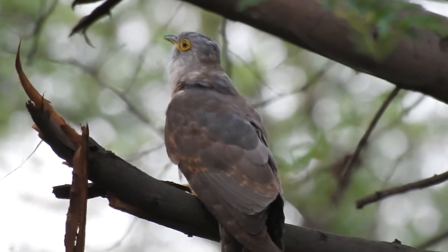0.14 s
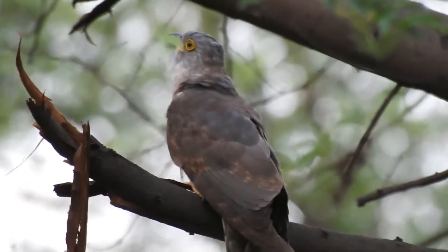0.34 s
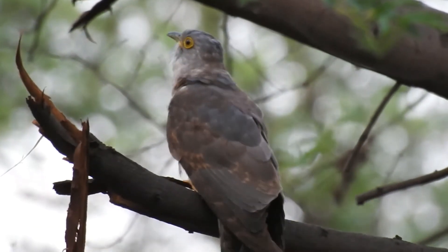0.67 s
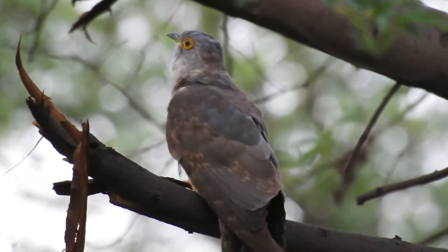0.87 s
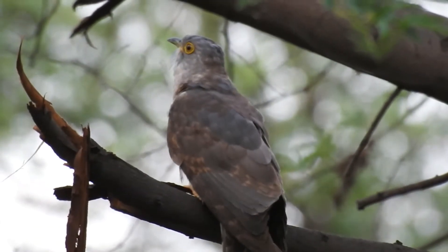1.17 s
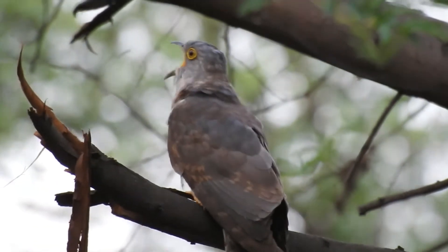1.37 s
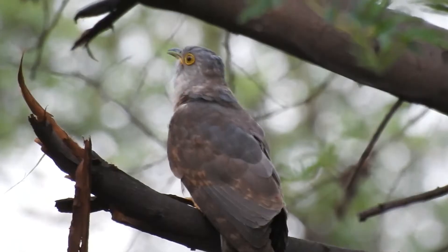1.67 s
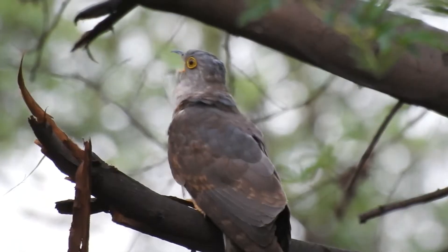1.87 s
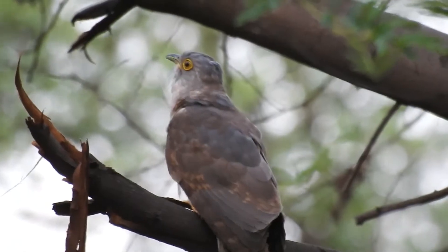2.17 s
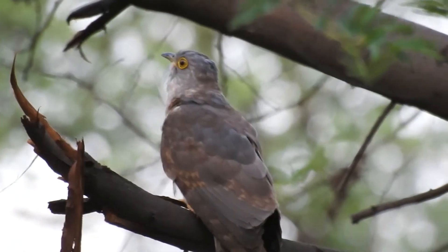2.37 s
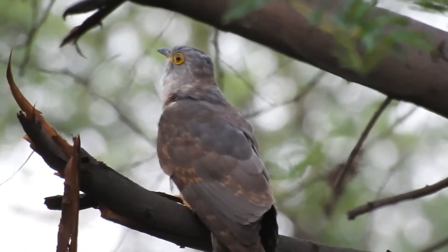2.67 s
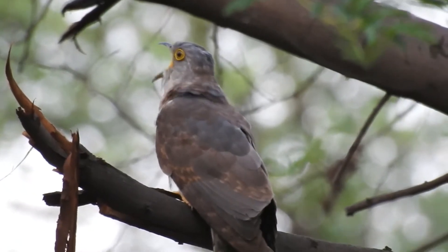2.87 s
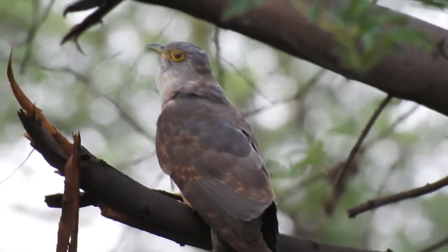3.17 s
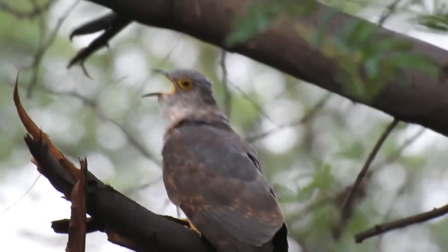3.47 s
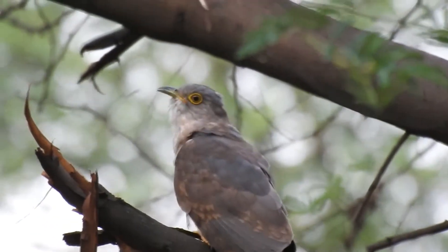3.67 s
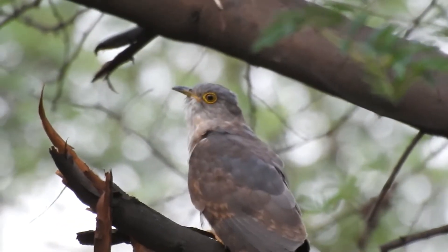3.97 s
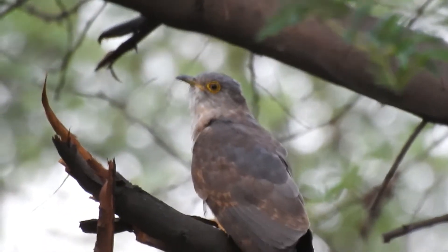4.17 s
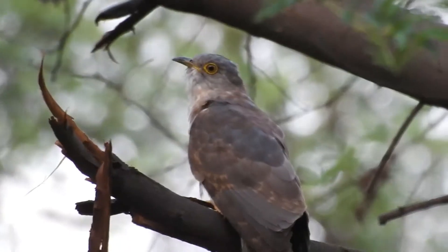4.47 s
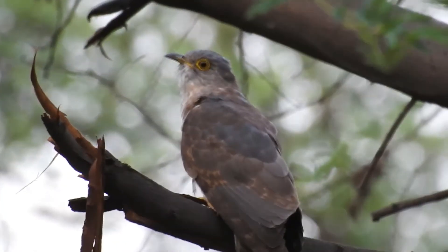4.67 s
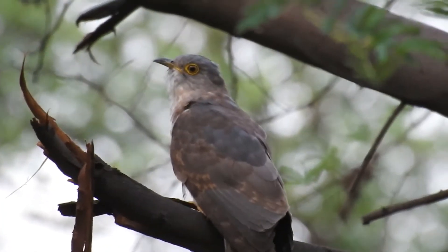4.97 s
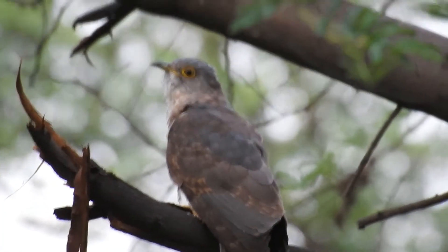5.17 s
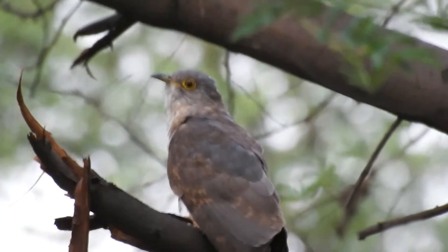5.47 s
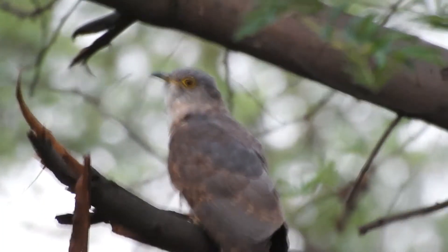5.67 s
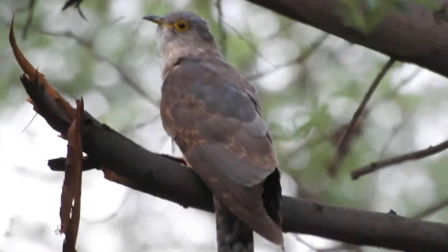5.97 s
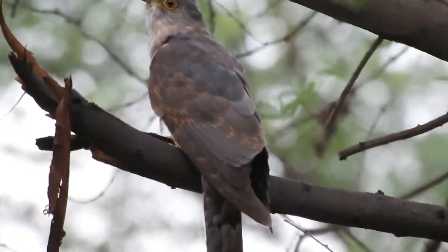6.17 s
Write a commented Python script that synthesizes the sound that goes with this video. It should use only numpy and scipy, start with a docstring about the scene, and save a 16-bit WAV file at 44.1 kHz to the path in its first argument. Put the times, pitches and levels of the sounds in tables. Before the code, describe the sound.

A cuckoo-like bird whistles three loud two-part phrases in echoing woodland while a harsher bird squawks and wind buffets the microphone.

```python
"""A cuckoo whistles three two-part phrases, echoed by trunks and a far tree line, while a harsh-voiced bird squawks.
Behind them faint whistles slide, small birds twitter far away and distant traffic hums.
Gusts buffet, crackle and snap at the two microphone ports of a hand-held device, mostly the right one.
Whistles are gliding sines, squawks are throbbing stacks of partials; wind and air are coloured noise,
echoes are scattered noise responses, and handling knocks are short damped rings."""
import sys
import numpy as np
from scipy import signal
from scipy.fft import rfft, irfft
from scipy.io import wavfile
from scipy.ndimage import uniform_filter1d

SR = 44100
rng = np.random.default_rng(int(sys.argv[2]) if len(sys.argv) > 2 else 0)


def amplitude_ratio(level_db):
    """Convert a level in decibels to the matching linear amplitude (field) ratio."""
    exponent = np.asarray(level_db, float) / 20
    return 10 ** exponent


def store_pcm(level_fs):
    """Save levels as 16-bit WAV."""
    pcm = np.round(np.clip(level_fs, -1, 1) * 32767).astype(np.int16)
    wavfile.write(sys.argv[1], SR, np.atleast_2d(pcm).T)


N = 279153
TIME = np.arange(N) / SR

# squawks of the harsh bird: (start [s], length [s], top pitch [Hz], relative level at the peak [dB],
# final drop in pitch [Hz], peak position [share of length])
SQUAWK_CALLS = [(0.595, 0.069, 1238, -42.5, 60, .4), (0.708, 0.084, 1263, -43.5, 120, 0.459),
                (0.829, .075, 1262, -43, 100, 0.595), (0.961, .115, 1261, -41.5, 100, 0.546),
                (1.133, .13, 1200, -40.5, 120, .55), (1.96, 0.097, 1185, -39.5, 29.7, .4),
                (2.075, 0.15, 1249, -33, 4.8, .43), (2.24, 0.21, 1285, -31.5, 230, .3),
                (3.189, .06, 1230, -35.5, 5.05, 0.57), (3.305, 0.18, 1296, -30.5, 12.1, .5),
                (3.491, 0.1, 1306, -31.5, 80, .3), (3.582, .155, 1233, -36.5, 200, .4),
                (3.785, 0.077, 1272, -38.5, 100, 0.563), (3.896, 0.098, 1222, -31, 5, 0.46),
                (4.018, .15, 1254, -30.5, 4, .47), (4.181, .118, 1305, -28, 5, .45),
                (4.305, .365, 1297, -29.5, 30, 0.659), (4.74, 0.13, 1230, -44.5, 90, .4),
                (5.884, 0.025, 1213, -34.5, 20, .45), (5.975, 0.14, 1272, -32.5, 5, .45),
                (6.169, 0.048, 1281, -34.5, 29, 0.37), (6.222, 0.064, 1250, -36, 110, 0.27),
                (6.299, 0.048, 1198, -34, 5, .35)]


def on_log(table, hz):
    """A (frequency [Hz], value) table read on a log-frequency axis."""
    at, value = np.transpose(table)
    return np.interp(np.log(np.maximum(hz, 1)), np.log(at), value)


def unit(x):
    """Scaled to rms 1."""
    return x / np.sqrt(np.mean(x ** 2))


def noise(colour, weight=1):
    """White noise filtered to a (frequency [Hz], level [dB]) colour."""
    spectrum = rfft(rng.standard_normal(N))
    gain = amplitude_ratio(on_log(colour, np.fft.rfftfreq(N, 1 / SR)))
    return irfft(spectrum * gain * weight, N)


def walk(rate):
    """A wandering control signal of rms 1: random levels held 1 / rate seconds and slewed twice."""
    k = int(SR / rate)
    held = np.repeat(rng.standard_normal(N // k + 1), k)
    return unit(uniform_filter1d(uniform_filter1d(held, k), k)[:N])


def notes(tables, fade_s, bend_s):
    """A gate open during notes, then pitch, level and other columns at every sample, with rounded corners."""
    s, hz, *columns = np.transpose(np.concatenate(tables))
    gate = sum((TIME >= note[0][0]) & (TIME < note[-1][0]) for note in tables)
    pitch = uniform_filter1d(np.interp(TIME, s, hz), int(bend_s * SR))
    curves = [np.minimum(gate, 1.), pitch] + [np.interp(TIME, s, c) for c in columns]
    return [uniform_filter1d(c, int(fade_s * SR)) for c in curves]


def place(x, pan_db, lag_s):
    """Stereo position: left is pan_db louder than right and hears the sound lag_s later."""
    turn = np.exp(-1j * np.pi * np.fft.rfftfreq(N, 1 / SR) * lag_s)
    return irfft(rfft(x) * np.array([turn * amplitude_ratio(pan_db / 2), amplitude_ratio(-pan_db / 2) / turn]), N)


def cuckoo_notes():
    """Each phrase as (time, pitch, level) points: a held note, then a dipping one stretched to its length."""
    # held first note of each phrase: (end [s], length [s], top pitch [Hz], level [dB])
    held_calls = [(0.181, .26, 2292, -15), (1.695, .226, 2375, -15.5), (3.183, .257, 2437, -14.5)]
    # second note, which dips and climbs back: (start [s], length [s], top pitch [Hz], level [dB])
    dip_calls = [(0.329, 0.38, 2355, -16.5), (1.847, .369, 2462, -15), (3.333, .373, 2491, -14.5)]
    # shapes, moved to the top pitch of each note
    # rise of the held note: (time after start [s], pitch [Hz], level relative to the note [dB])
    rise = [(0, 1720, -23), (.016, 2110, -12.5), (.033, 2300, -1.5), (.052, 2385, 0), (0.073, 2414, -2),
            (0.099, 2397, -0.4)]
    # fall of the held note: (time before end [s], pitch [Hz], level relative to the note [dB])
    fall = [(.075, 2385, 0.5), (.045, 2275, -1.9), (.02, 2040, -2.5), (.006, 1810, -13),
            (0.0011, 1760, -25)]
    # dipping note: (time after start [s], pitch [Hz], level relative to the note [dB])
    dip = [(0, 1640, -26.5), (.019, 2220, -6.5), (.035, 2400, -1.5), (0.052, 2490, 0.4), (.082, 2400, 0.2),
           (.136, 2195, -1.5), (.17, 1810, -2.5), (.198, 1485, -8.5), (.214, 1430, -17), (.23, 1760, -3),
           (.245, 2160, -6.4), (.276, 2085, -2.5), (.33, 1994, -4.5), (.36, 1880, -12), (.378, 1776, -25)]
    top = max(hz for _, hz, _ in rise)
    dip_top, dip_s = max(hz for _, hz, _ in dip), dip[-1][0]
    phrases = []
    for end, long, hz, db in held_calls:
        opening = [(end - long + s, f * hz / top, db + d) for s, f, d in rise]
        closing = [(end - s, f * hz / top, db + d) for s, f, d in fall]
        phrases.append(opening + closing)
    for start, long, hz, db in dip_calls:
        phrases.append([(start + s * long / dip_s, f * hz / dip_top, db + d) for s, f, d in dip])
    return sorted(phrases)


def cuckoo():
    """A nearly pure whistle with faint, fluttering partials that grow with effort."""
    # weaker partials: (multiple of the whistle [ratio], level relative to it before effort and beak [dB])
    whistle_partials = [(2, -25), (3, -16), (4, -30), (5, -26.5)]
    # beak resonance, which colours the partials, strongest near 7 kHz: (frequency [Hz], gain [dB])
    beak = [(3000, -3.5), (4800, -9.5), (5800, -4.5), (7000, -1.5), (12500, -5)]
    gate, hz, db = notes(cuckoo_notes(), fade_s=0.002, bend_s=0.005)
    phase = 2 * np.pi * np.cumsum(hz * (1 + 0.00209 * walk(90))) / SR
    # the beak closes on low notes and mutes the partials
    effort_db = 1.4 * (db + 14.0) + 11.0 * np.log2(hz / 2280.0) + 2.8 * walk(120)
    upper = sum(amplitude_ratio(d + effort_db + on_log(beak, k * hz)) * np.sin(k * phase) for k, d in whistle_partials)
    loudness = amplitude_ratio(db + 0.71 * walk(60))
    return np.sqrt(2) * gate * loudness * (np.sin(phase) + upper)


def squawk_notes():
    """Each squawk scoops up, swells, fades and drops in pitch: (time, pitch, level, gain of low partials)."""
    attack_s, scoop_hz = .018, 25.1
    onset_db, swell_db, fade_db, end_db = -9.5, -4.5, -5, -12.5
    drop_from = 0.45  # share of the time between peak and end
    # gain of the two lowest partials: at the start, when held, and added as the pitch drops
    low_start_db, low_held_db, low_db_per_hz = -4, 4, 0.0089
    squawks = []
    for s, long, hz, db, drop, peak in SQUAWK_CALLS:
        drop_share = peak + drop_from * (1 - peak)
        squawks.append([
            (s, hz - scoop_hz, db + onset_db, low_start_db),
            (s + min(attack_s, long / 4), hz - scoop_hz / 2, db + swell_db, low_start_db),
            (s + peak * long, hz, db, low_held_db),
            (s + drop_share * long, hz, db + fade_db, low_held_db),
            (s + long, hz - drop, db + end_db, low_held_db + low_db_per_hz * drop)])
    return squawks


def squawker():
    """Partials and breath coloured by the throat; each squawk starts as separate throbs, then runs clearer."""
    # resonances of the throat: (frequency [Hz], gain [dB])
    throat = [(1300, -35.5), (2600, -3.5), (3900, -12), (5200, -1.5), (6500, -1.5), (7800, -4.5),
              (9100, -22.5), (11700, -11.5), (14000, -17.5)]
    throb_hz = 83.65
    gate, hz, db, low_db = notes(squawk_notes(), fade_s=0.0024, bend_s=0.01)
    starts = np.transpose(SQUAWK_CALLS)[0]
    age = TIME - starts[np.maximum(np.searchsorted(starts, TIME) - 1, 0)]
    # soft squawks hardly throb
    effort = np.clip((db + 50.) / 14.1, .2, 1)
    rasp = np.clip(effort * (0.15 + 0.768 * np.exp(-(age / 0.1097) ** 2)), 0, 1)
    # the pitch is rougher where the voice rasps
    jitter = (0.0041 + 0.01188 * rasp) * walk(350)
    phase = 2 * np.pi * np.cumsum(hz * (1 + jitter)) / SR
    stack = [amplitude_ratio(on_log(throat, k * hz) + 3.6 * walk(200)) * np.sin(k * phase) for k in range(1, 12)]
    breath = amplitude_ratio(-5.5) * (.3 + rasp) * unit(noise(throat))
    cycle = (age * throb_hz - .35 + 0.037 * walk(30)) % 1
    # each throb opens fast and closes slowly
    pulse = (1 - np.exp(-cycle / 0.074)) * np.exp(-(cycle / 0.5) ** 2)
    throb = 1 - rasp + 2.52 * rasp * pulse
    voice = amplitude_ratio(low_db) * sum(stack[:2]) + sum(stack[2:]) + breath
    return gate * amplitude_ratio(db) * throb * voice


def port_shares(pan_db):
    """Splits a power between left and right so that the two shares sum to 1."""
    ratio = amplitude_ratio(2 * pan_db)
    return np.array([ratio / (1 + ratio), 1 / (1 + ratio)])


def gusts():
    """Strength of the wind at each port: the steady part wavers, buffets add to it in power."""
    # steady part: (time [s], relative level [dB], left minus right [dB])
    steady_wind = [(0, -35.5, -8), (1.09, -40, -1), (1.138, -19, -7), (1.45, -16.5, -14.5), (1.75, -16, -2),
                   (2.0, -26, -10), (2.08, -20, 3), (2.3, -17, -3.5), (2.5, -28, -21.5), (2.561, -39, 0),
                   (2.66, -24, -14.5), (2.79, -29, -17), (2.89, -45, -2), (3.19, -30, -3),
                   (3.319, -25.5, -10), (3.62, -21.5, -5.5), (3.85, -19.5, -18.5), (4.0, -21.5, -8.5),
                   (4.3, -36.5, -8), (4.55, -31, -8), (4.69, -38.5, -2), (5.27, -40.5, -2.5),
                   (5.42, -21.5, -2.5), (5.74, -24, -3), (5.779, -32.5, -5), (5.84, -15.5, -13.5),
                   (6.33, -12.5, -9)]
    # single buffets: (time [s], relative peak level [dB], length between 1/e power points [s],
    # left minus right [dB])
    single_buffets = [(.085, -19, 0.068, -2.5), (0.216, -18.5, 0.028, -19.5), (0.331, -27, 0.018, -14),
                      (0.605, -19, 0.029, -13), (.69, -19.5, 0.038, -13.5), (0.82, -27.5, 0.029, -8),
                      (0.907, -16.5, 0.034, -9.5), (0.979, -18, 0.022, -4), (1.265, -16.5, 0.024, -7),
                      (2.067, -13.5, 0.023, -11.5), (2.39, -17.5, 0.012, -22), (2.645, -13.5, 0.016, -28),
                      (2.992, -25.5, 0.046, -17), (3.16, -17.5, 0.02, -14), (3.394, -21.5, 0.021, -20),
                      (3.695, -13.5, 0.043, -12), (3.977, -17.5, 0.014, -15), (4.41, -29, 0.12, -26),
                      (4.595, -25.5, 0.026, -16), (5.331, -24, 0.038, -3), (5.428, -19, 0.074, -15),
                      (5.501, -14.5, 0.027, -7.5), (5.615, -21, 0.054, -7), (5.679, -10, 0.044, -18)]
    s, db, pan_db = np.transpose(steady_wind)
    waver = amplitude_ratio(5.4 * np.array([walk(12), walk(14)]))
    power = amplitude_ratio(2 * np.interp(TIME, s, db)) * port_shares(np.interp(TIME, s, pan_db)) * waver
    for s, db, long, pan_db in single_buffets:
        near = slice(max(int((s - 2 * long) * SR), 0), int((s + 2 * long) * SR))
        bump = np.exp(-(2 * (TIME[near] - s) / long) ** 2)
        power[:, near] += amplitude_ratio(2 * db) * port_shares(pan_db)[:, None] * bump
    return np.sqrt(power)


def wind():
    """Eddies thump each port alone in bursts; strong ones crackle and flatten at the diaphragm's limit."""
    # colour of the thumps: (frequency [Hz], relative density [dB per Hz])
    thump_colour = [(25, -22), (40, -19), (70, -0.5), (110, 2), (190, -4.5), (240, -17), (330, -27.5),
                    (600, -51.5), (2000, -51.5)]
    # colour of the crackle: (frequency [Hz], relative density [dB per Hz])
    crackle_colour = [(200, -28), (350, 2.5), (700, -9), (1500, -18.), (4000, -31.5)]
    limit = amplitude_ratio(-5.5)
    ports = np.array([unit(unit(noise(thump_colour)) * amplitude_ratio(3.84 * walk(45))) for _ in range(2)])
    # unrelated ports add in power: doubling makes up for averaging them
    push = 2 * gusts() * ports / limit
    crackle = np.array([unit(unit(noise(crackle_colour)) * amplitude_ratio(5.5 * walk(200))) for _ in range(2)])
    flattened = push / (1 + push ** 4) ** 0.21
    crackle_level = amplitude_ratio(-23.5) * np.minimum(np.abs(push) ** 2.14, 1)
    return limit * (flattened + crackle_level * crackle)


def pops():
    """The right diaphragm snaps against its stop: a sharp corner at the crest of a short low thump."""
    # snaps, as in hard gusts: (time [s], relative level [dB])
    snaps = [(1.484, -28), (1.514, -24.5), (1.689, -26), (3.402, -28.5), (3.679, -26.5), (3.977, -27),
             (5.433, -31), (5.492, -28), (5.687, -34), (5.716, -21.5), (5.878, -24.5), (5.91, -27.5),
             (6.027, -23.5), (6.067, -35), (6.087, -35), (6.122, -24), (6.156, -24.5), (6.196, -26),
             (6.249, -24), (6.282, -22)]
    t = TIME[:SR // 10] - .05
    after = np.maximum(t, 0)
    corner = np.exp(-after / 0.0014) - np.exp(-after / 0.0001)
    thump = np.exp(-(t / 0.0057) ** 2) * np.cos(2 * np.pi * 187.0 * t)
    kicks = np.zeros(N)
    for s, db in snaps:
        kicks[int(s * SR)] = amplitude_ratio(db)
    # the left port gets a faint, inverted copy
    return amplitude_ratio(18.0) * np.array([[.08], [-1]]) * signal.fftconvolve(kicks, corner + thump, "same")


def knocks():
    """Short damped rings of the housing."""
    # a sharp tick and a finger on the housing:
    # (time [s], level before damping [dB], ring [Hz], 60 dB decay [s], left minus right [dB])
    housing_knocks = [(1.6227, 14, 8940, 0.000078, -6.5), (5.838, -27.5, 2240, .012, 3),
                      (5.841, -15.5, 943, 0.02, 2.5), (5.849, -10.5, 7200, 0.00087, 4),
                      (5.897, -12.5, 9000., 0.00069, -2)]
    out = np.zeros((2, N))
    for s, db, hz, t60, pan_db in housing_knocks:
        t = np.maximum(TIME - s, 0)
        ring = np.sin(2 * np.pi * hz * t) * amplitude_ratio(-60 * np.minimum(t / t60, 4))
        out += ring * amplitude_ratio(db + np.array([[pan_db], [-pan_db]]) / 2)
    return out


def faint_whistles():
    """Thin, fluttering slides, loudest early on: far birds, late cuckoo echoes and a falling squawk partial."""
    # (start [s], length [s], first pitch [Hz], last pitch [Hz], level at the peak [dB])
    faint_slides = [(.725, .06, 4290, 3790, -47.5), (1.135, .05, 4520, 3820, -42.5),
                    (1.341, 0.053, 2750, 3185, -39), (4.195, .12, 2250, 1850, -42),
                    (4.385, .09, 2570, 2100, -35), (4.507, .045, 2900, 3160, -43),
                    (4.77, .15, 2476, 1995, -40.5), (4.94, .1, 2550, 2896, -44.5),
                    (5.003, 0.027, 4300, 3990, -53), (5.1, .09, 2665, 2970, -49),
                    (5.163, 0.04967, 3470, 3420, -48), (5.455, 0.17, 1260, 1296, -51),
                    (5.582, 0.052, 4380, 3930, -47), (5.767, 0.058, 4330, 4380, -46.5)]
    peak, start_db, end_db = 0.32, -0.5, -11  # peak as share of the length; levels relative to it
    slides = []
    for s, long, first, last, db in faint_slides:
        slides.append([(s, first, db + start_db),
                       (s + peak * long, first + peak * (last - first), db),
                       (s + long, last, db + end_db)])
    gate, hz, db = notes(slides, fade_s=0.013, bend_s=0.0057)
    loudness = amplitude_ratio(db + 3 * walk(70))
    phase = 2 * np.pi * np.cumsum(hz * (1 + .008 * walk(150))) / SR
    return np.sqrt(2) * gate * loudness * np.sin(phase)


def twitter(count):
    """Many small birds at the edge of hearing: short sine slides at chance moments."""
    out, t = np.zeros(N + SR), TIME[:SR // 8]
    for when, high, slide, long, loud in rng.random((count, 5)):
        length = .03 + 0.076 * long
        hz = 2000. * 2 ** (1.3 * high) * (1 + .3 * (slide - .6) * t / length)
        shape = np.sin(np.pi * np.minimum(t / length, 1)) ** 2
        chirp = shape * np.sin(2 * np.pi * np.cumsum(hz) / SR)
        out[int(when * N):][:len(t)] += amplitude_ratio(-56 + 5 * loud) * chirp
    return out[:N] * amplitude_ratio(3 * walk(90))


def wood(x):
    """Separate echoes, each partly clear and partly blurred, over a dense tail from leaves and trunks."""
    # (delay [s], level [dB], left minus right [dB], blur [s], clear share [0-1])
    tree_echoes = [(.0105, -13, -4.5, 0.00055, 0.4), (0.0178, -12, -1.5, .002, 0.04),
                   (0.049, -15, -4, 0.024, .05), (0.1341, -18, -0.5, .007, 0.46),
                   (.245, -24.5, 0, 0.065, .05), (.46, -25, -4.5, .005, .7)]
    t60_s, tail_db = 2.97, -16.5
    t = TIME[:2 * SR]
    scatter = rng.standard_normal((2, 2, len(t)))
    tail = scatter[0] * amplitude_ratio(-60 * t / t60_s) * (1 - np.exp(-t / 0.0088))
    response = amplitude_ratio(tail_db) * tail / np.sqrt(np.sum(tail[0] ** 2))
    # blurs are mostly alike left and right
    spread = scatter[1, 0] + 0.17 * scatter[1]
    for s, db, pan_db, blur_s, clear in tree_echoes:
        blur = np.exp(-((t - s) / blur_s) ** 2)
        echo = np.sqrt(1 - clear ** 2) * spread * blur / np.sqrt(np.sum(blur ** 2))
        echo[:, int(s * SR)] += clear
        response += echo * amplitude_ratio(db + np.array([[pan_db], [-pan_db]]) / 2)
    # leaves swallow the treble
    dull = signal.sosfilt(signal.butter(1, 6000., fs=SR, output="sos"), x)
    return signal.fftconvolve(dull[None], response, axes=1)[:, :N]


def air():
    """Far traffic, leaves and hiss as one noise whose octaves wander alone.

    Bass and midrange are mostly alike left and right, the treble differs."""
    # colour: (frequency [Hz], relative density [dB per Hz])
    air_colour = [(30, -8.5), (50, -0.5), (90, -1), (200, -6.5), (300, -14), (500, -9), (1000, -15),
                  (2200, -20), (3200, -18.5), (5500, -19.5), (7500, -13.5), (9000, -16.5), (15000, -30.5)]
    # left-right likeness: (frequency [Hz], correlation [-1 to 1])
    likeness = [(100, 1), (1000, 0.86), (2000, 0.96), (4200, 0.46), (8500, 0.046)]
    hz = np.fft.rfftfreq(N, 1 / SR)
    alike = np.clip(on_log(likeness, hz), -1, 1)
    mid, side = noise(air_colour, np.sqrt(1 + alike)), noise(air_colour, np.sqrt(1 - alike))
    both = rfft(np.array([mid + side, amplitude_ratio(-1.2) * (mid - side)]))
    # everything below the first octave joins it
    octave = np.round(np.log2(np.maximum(hz, 125) / 125))
    bands = []
    for k in np.unique(octave):
        wander = amplitude_ratio(1.63 * walk(2.944) + 1.07 * walk(16.0))
        bands.append(irfft(both * (octave == k), N) * wander)
    return unit(sum(bands)) * amplitude_ratio(-40)


def scene():
    """Birds in the wood, wind and handling at the microphone."""
    near, harsh, faint = cuckoo(), squawker(), faint_whistles() + twitter(count=70)
    direct = place(near, pan_db=-1.6, lag_s=-0.000018)
    direct += place(amplitude_ratio(2.0) * harsh, pan_db=-1.0, lag_s=-0.000036)
    direct += place(faint, pan_db=-2.0, lag_s=1e-5)
    # the harsh and faint voices reach the wood louder than they are heard directly
    echoed = wood(near + amplitude_ratio(5.5) * harsh + amplitude_ratio(4.) * faint)
    return direct + echoed + air() + wind() + pops() + knocks()


def low_pass(x):
    """Removes everything above the highest recorded frequency."""
    return signal.sosfilt(signal.butter(12, 15500, fs=SR, output="sos"), x)


def record(dry):
    """The microphone dulls the top; gain control turns both channels down when loud; peaks are rounded."""
    # response: (frequency [Hz], gain [dB])
    microphone = [(8300, 0.5), (9000, -5.5), (9500, -12), (12000, -18.5), (16000, -22.5)]
    heard = irfft(rfft(dry) * amplitude_ratio(on_log(microphone, np.fft.rfftfreq(N, 1 / SR))), N)
    # the control follows the louder channel's power with a 0.06 s time constant
    fall = np.exp(-1 / (.06 * SR))
    level = np.sqrt(signal.lfilter([1 - fall], [1, -fall], np.max(heard ** 2, axis=0)))
    turned = heard / (0.5 + (level / 0.36) ** 2) ** 0.21
    rounded = np.tanh(turned / 1.316) * 1.254
    return low_pass(rounded)


dry = scene()
out = record(dry)
store_pcm(out)
```